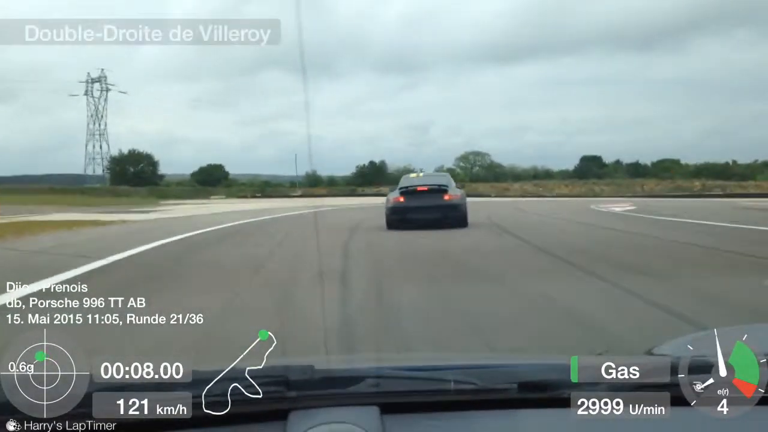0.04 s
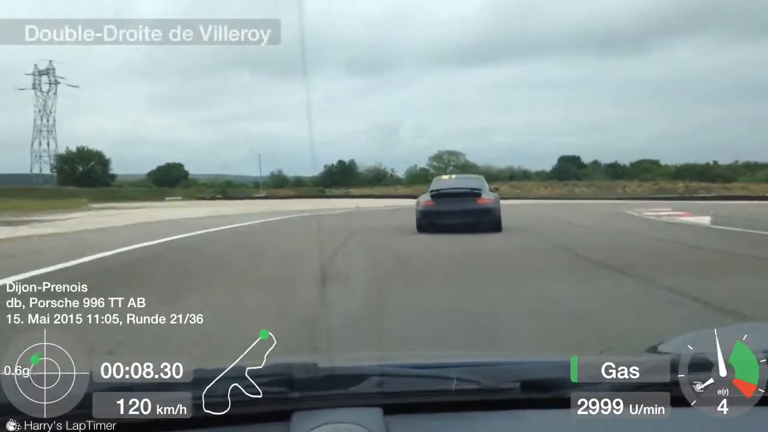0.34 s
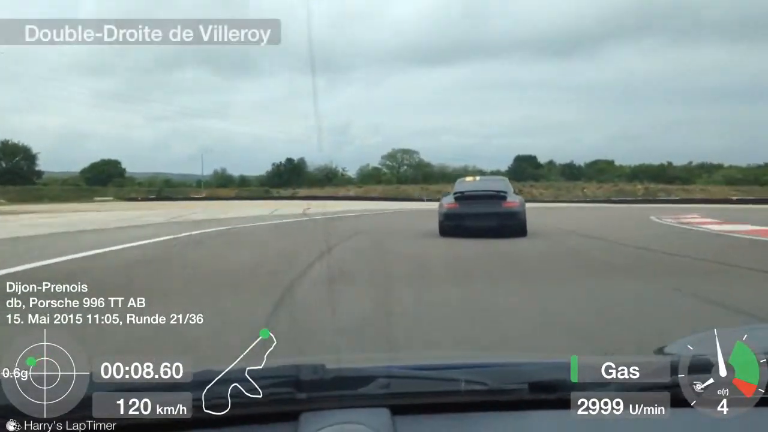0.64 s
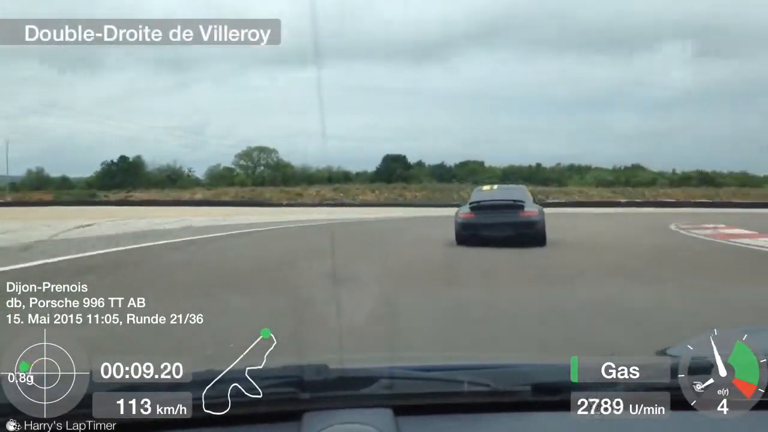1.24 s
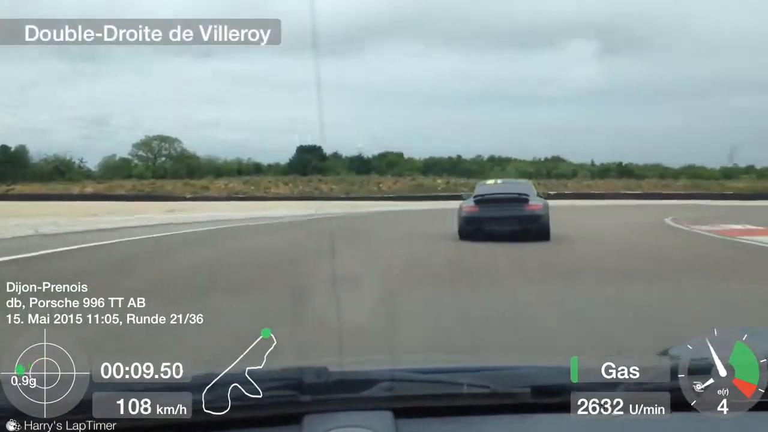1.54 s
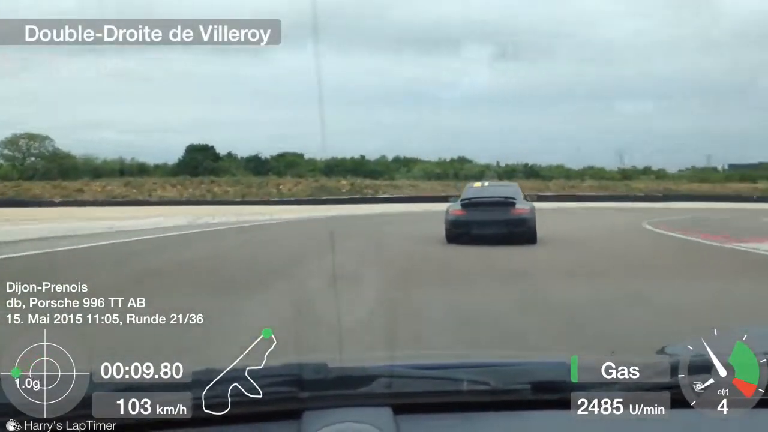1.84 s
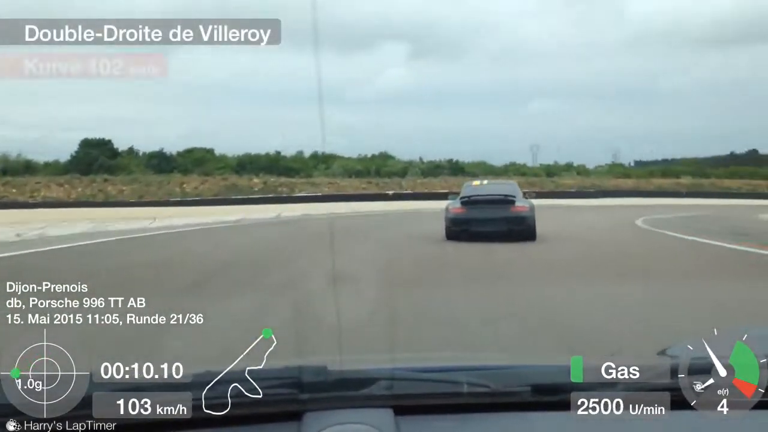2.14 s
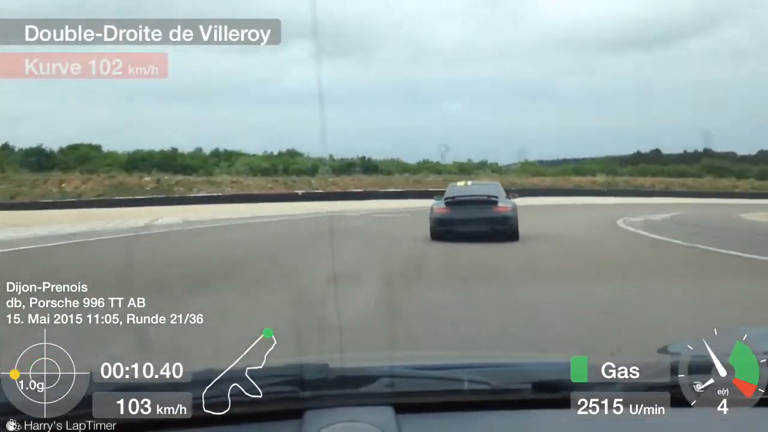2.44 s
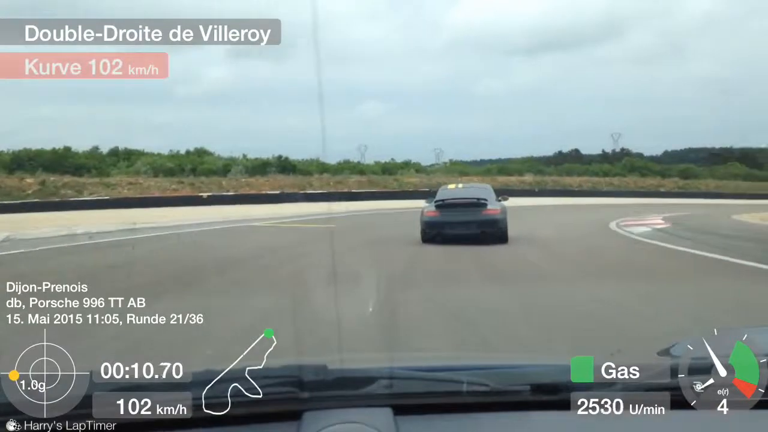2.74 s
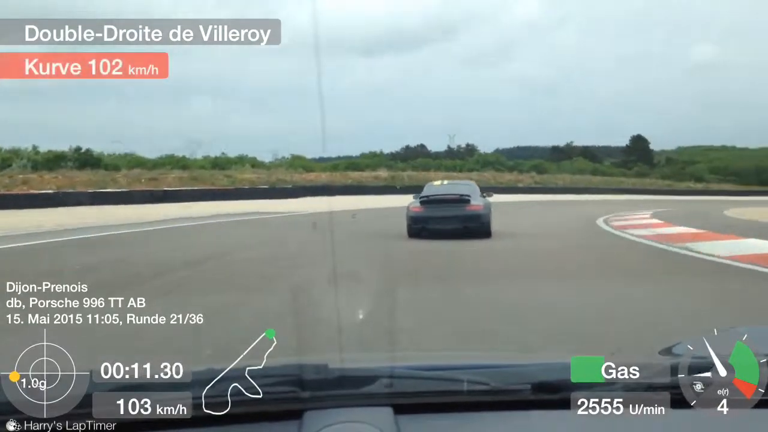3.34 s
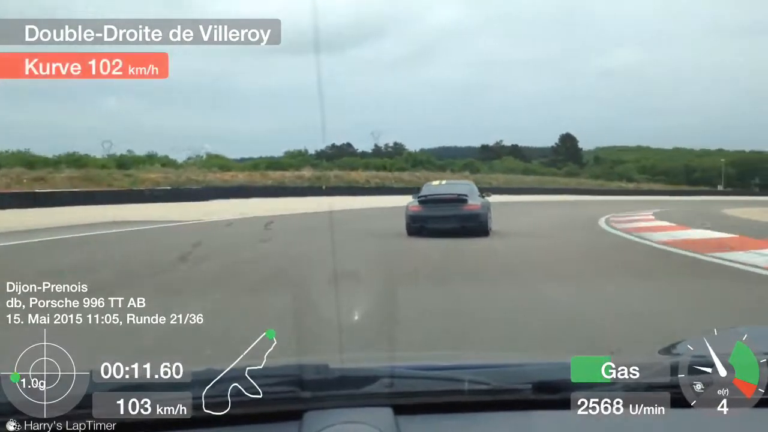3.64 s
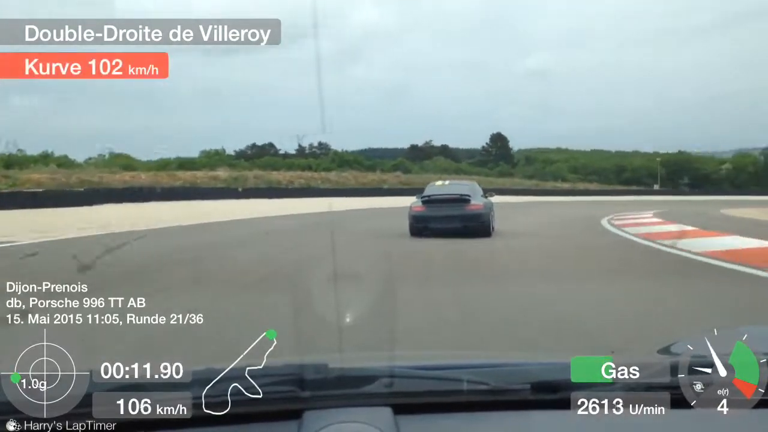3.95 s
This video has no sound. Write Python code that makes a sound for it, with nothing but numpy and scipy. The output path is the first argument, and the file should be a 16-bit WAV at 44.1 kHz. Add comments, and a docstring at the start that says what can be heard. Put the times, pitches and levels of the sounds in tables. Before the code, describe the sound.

A sports car's engine drones over steady road rumble, heard from inside. Its pitch dips in the first second, then holds, growing louder from about 2.5 seconds. A faint gear whine and thin squeals sit above it, while grit sprays lightly against the body around 0.2, 1.5 and 2 seconds. At about 3.6 seconds a stone hits the windscreen with one sharp, loud crack and a brief glassy ring.

```python
"""Inside a sports car rounding a long bend on a race track. The six-cylinder engine drones at multiples
of its crank speed, swelling with the throttle, and a gear whines above it. The road rumbles through
the body under a thin rush of air and faint squeals, while grit thrown up by the car ahead ticks against
it. Near the end a stone hits the windscreen: one sharp crack and a brief ring of glass."""
import sys
import numpy as np
from scipy import signal
from scipy.fft import rfft, irfft
from scipy.io import wavfile

SR = 44100
rng = np.random.default_rng(int(sys.argv[2]) if len(sys.argv) > 2 else 0)


def bounce(signal):
    """Save signal as a 16-bit WAV file at the path given by the first command-line argument."""
    frames = np.transpose(np.atleast_2d(signal))
    limited = np.clip(frames, -1, 1)
    pcm = np.round(limited * 32767).astype(np.int16)
    wavfile.write(sys.argv[1], SR, pcm)


N = 176400
T = np.arange(N) / SR

# The revs. Each row: time in seconds, crank turns per second.
CRANK_SPEED = [(0, 49.2), (.35, 46), (.62, 42.6), (.85, 41.7), (1.2, 42.2), (1.75, 41.55), (2.25, 41.7),
               (2.58, 41.9), (2.75, 41.9), (3.05, 42.05), (3.7, 42.6), (4, 43.6)]
# Engine tones on the throttle and drivetrain tones while slowing.
# Each row: multiple of crank speed, level in dB relative to that layer's fader.
THROTTLE_ORDERS = [(1.5, -17.5), (3, 1), (5, -22.5), (6, -26.5)]
SLOWING_ORDERS = [(1, -20.5), (1.35, 4.5), (2, -6.5), (5, 1.5), (6.5, -16.5), (12, -20)]
# Faders for those two layers, the growl and the gear whine. Each row: time in seconds, level in dB.
THROTTLE_FADER = [(0, -28.5), (.5, -24), (.95, -25), (1.25, -19.5), (1.5, -22), (1.78, -15), (2.0, -23),
                  (2.22, -24.5), (2.42, -19), (2.59, -15.5), (2.69, -17.5), (3.0, -14), (3.3, -15),
                  (3.56, -12.5), (3.7, -17.5), (4, -13)]
SLOWING_FADER = [(0, -23.5), (.25, -22.5), (.5, -28.5), (.9, -37.5), (1.5, -54), (4, -38)]
GROWL_FADER = [(0, -42.5), (1.3, -41), (1.8, -42), (2.2, -51), (2.75, -43), (3.07, -32.5), (3.3, -44),
               (3.6, -38.5), (3.85, -31), (4, -37.5)]
WHINE_FADER = [(0, -63), (.5, -47), (.7, -37), (1.5, -31), (2.05, -40), (2.35, -33.5), (2.65, -36),
               (3.05, -31), (3.5, -36.5), (3.8, -39.5), (4, -49)]

# Colours of the road noise, low to high. Each row: frequency in Hz, density in dB per Hz.
SHAKE_SPECTRUM = [(12, -66), (25, -55), (40, -50.5), (50, -45), (65, -61.5)]
BOOM_SPECTRUM = [(38, -57.5), (48, -46), (60, -43.5), (78, -38), (100, -41), (125, -47.5), (170, -74)]
PANEL_SPECTRUM = [(85, -74.5), (120, -50), (142, -42), (158, -36.5), (176, -44), (215, -47.5), (242, -44.5),
                  (275, -58.5), (380, -86.5)]
TYRE_SPECTRUM = [(200, -70.5), (290, -55), (350, -57), (405, -53.5), (480, -60), (540, -61.5), (620, -66),
                 (720, -66.5), (850, -67), (1050, -69.5), (1200, -71), (1550, -73), (2000, -78),
                 (2450, -80), (3000, -88), (5000, -100)]
AIR_SPECTRUM = [(1500, -100), (3200, -87.5), (4300, -88.5), (4900, -93), (7500, -97), (10000, -104),
                (13000, -106), (15000, -110)]
# Their swells; only the swing about the mean counts, scaled by a depth.
# Each row: time in seconds, contour in dB.
SHAKE_SWELL = [(0, -32), (.4, -23.5), (.7, -35.5), (1.2, -32), (1.55, -26), (1.9, -28.5), (2.2, -32),
               (2.8, -33), (3.3, -33.5), (3.7, -28.5), (4, -18)]
BOOM_SWELL = [(0, -13.5), (.12, -13), (.38, -16.5), (.55, -23), (0.799, -16), (.95, -24.5), (1.15, -17.5),
              (1.42, -32), (1.55, -19.5), (1.92, -19.5), (2.002, -25), (2.25, -23), (2.58, -12.5),
              (2.699, -21), (3.049, -18.5), (3.55, -19), (3.749, -25), (3.92, -18.5), (4, -2.5)]
PANEL_SWELL = [(0.0, -23), (0.03, -25.5), (1.32, -20.5), (1.65, -16.5), (1.78, -18.5), (1.86, -10.5),
               (2.04, -23), (2.12, -15.5), (2.33, -31.5), (2.39, -17), (2.65, -25), (3.47, -18),
               (3.75, -26.5), (3.98, -24.5)]
TYRE_SWELL = [(0.0, -33.5), (0.05, -36), (0.44, -33.5), (0.45, -34.5), (1.18, -35), (1.19, -36.5),
              (1.39, -33.5), (3.01, -38), (3.6, -37.5)]
AIR_SWELL = [(0.0, -51.5), (0.79, -51.5), (1.09, -50.5), (1.21, -52), (1.44, -54), (1.81, -49.5),
             (2.22, -53), (2.74, -52.5), (3.45, -50.5)]

# Stone on glass, contact then splintering. Each row: start in seconds, gain in dB.
STONE_HITS = [(3.6392, -6), (3.6432, -1.5), (3.6482, -1), (3.6522, -4.5), (3.669, -7.5)]
# Dense ring of the pane with its cabin reflections. Each row: frequency in Hz, density in dB per Hz.
PANE_SPECTRUM = [(500, -84), (1000, -65), (1700, -59.5), (2050, -60.5), (2350, -52.5), (3000, -53),
                 (3500, -53), (4100, -52), (4800, -48), (5200, -55), (5900, -51.5), (7100, -61.5),
                 (8600, -61), (11000, -64.5), (15000, -66.5)]
# Strongest windscreen modes. Each row: frequency in Hz, relative level in dB, 60 dB decay in seconds.
GLASS_MODES = [(1040, -14, .15), (1300, -12, .12), (1750, -12, .12), (2245, -4, .14), (2430, -5, .11),
               (2652, -6, .11), (3222, -2, .14), (3332, -4, .12), (3700, 0, .12), (3970, -4, .11),
               (4075, 1, .12), (4155, -3, .11), (4252, -3, .12), (4356, -4, .12), (4765, -2, .12),
               (5140, -5, .11), (5457, -4, .09), (8430, -11, .1)]
# Sprays of grit on the body.
# Each row: start in seconds, level in dB, rise in seconds, 60 dB decay in seconds, band position in Hz.
GRIT_SPRAYS = [(.231, -33.5, .002, .15, 5200), (.51, -50, .02, .2, 7500), (.66, -46.5, .025, .25, 6200),
               (.7605, -40, .001, .035, 7000), (1.474, -36.5, .014, .19, 3900),
               (1.708, -44.5, .02, .35, 5200), (1.952, -40.5, .015, .13, 4200),
               (2.06, -40, .001, .03, 6500), (2.58, -50, .01, .1, 7000), (3.1, -49, .025, .3, 7000),
               (3.53, -43.5, .025, .3, 5200)]
# Squeals of the moving car.
# Each row: start and end in seconds, pitch in Hz, resonance width in Hz, level at the crest in dB.
SQUEALS = [(.02, 0.448, 3250, 70, -58), (0.747, 2.003, 1035, 90, -43.5), (.9, 1.28, 4300, 60, -59),
           (2.3, 3.7, 1040, 90, -48), (2.4, 3.603, 2410, 40, -63), (2.5, 2.62, 8400, 40, -66),
           (2.6, 4.194, 4265, 53.7, -61)]


def engine():
    """Six cylinders fire three times a turn: a throttle drone, a drivetrain hum and a growl on top."""
    pulling = sum(crank_tone(order, curve(THROTTLE_FADER) + db) for order, db in THROTTLE_ORDERS)
    slowing = sum(crank_tone(order, curve(SLOWING_FADER) + db) for order, db in SLOWING_ORDERS)
    growl = crank_tone(9, curve(GROWL_FADER))  # third harmonic of the firing rate
    return pulling + slowing + growl


def gear_whine():
    """Meshing teeth sing at 14 times the crank speed, wavering slightly in pitch."""
    order = 14 * (1 + .004 * drift(8.7))
    return crank_tone(order, curve(WHINE_FADER), rough_db=1.7)


def crank_tone(order, db, rough_db=1.84):
    """One sine riding a multiple of the crank speed, its level a little unsteady."""
    phase = 2 * np.pi * np.cumsum(order * curve(CRANK_SPEED)) / SR + rng.uniform(0, 2 * np.pi)
    return np.sqrt(2) * from_db(db + rough_db * drift(13.7)) * np.sin(phase)


def road():
    """The road comes through the body: shake, boom and drumming panels, then tyre roar and rushing air."""
    shake = road_layer(SHAKE_SPECTRUM, SHAKE_SWELL, depth=.93, flutter_db=4, flutter_hz=6)
    boom = road_layer(BOOM_SPECTRUM, BOOM_SWELL, depth=.62, flutter_db=.3, flutter_hz=3.7)
    panels = road_layer(PANEL_SPECTRUM, PANEL_SWELL, depth=.6, flutter_db=1.06, flutter_hz=14)
    tyres = road_layer(TYRE_SPECTRUM, TYRE_SWELL, depth=.48, flutter_db=1.2, flutter_hz=15)
    air = road_layer(AIR_SPECTRUM, AIR_SWELL, depth=.92, flutter_db=1.2, flutter_hz=13)
    return shake + boom + panels + cabin(tyres + air)


def road_layer(spectrum, swell, depth, flutter_db, flutter_hz):
    """One band of road noise, swelling and fluttering with the surface."""
    swing_db = curve(swell) - curve(swell).mean()
    return coloured(spectrum) * from_db(depth * swing_db + flutter_db * drift(flutter_hz))


def stone():
    """A quick run of fractures sets the laminated pane ringing: a noisy crack with glassy tones in it."""
    rise_s, modes_db = .0013, -29
    split = signal.butter(1, 5500, fs=SR, output="sos")
    out = np.zeros(N)
    for start, db in STONE_HITS:
        dense = coloured(PANE_SPECTRUM)
        body = signal.sosfilt(split, dense)
        treble = dense - body
        crack = body * burst(start, rise_s, t60=.087) + treble * burst(start, rise=.0039, t60=.1)
        out += from_db(db) * crack
    for hz, mode_db, t60 in GLASS_MODES:
        power = sum((from_db(db) * burst(start, rise_s, t60)) ** 2 for start, db in STONE_HITS)
        ring = np.sin(2 * np.pi * hz * T + rng.uniform(0, 2 * np.pi))
        out += from_db(modes_db + mode_db) * np.sqrt(power) * ring
    return out


def grit_ticks():
    """Fine grains tick at random against the body, louder as the air rushes."""
    grains_per_s, spread_db, t60, level_db = 200, 3.1, .005, -61.5
    impacts = rng.random(N) < grains_per_s / SR
    sizes = from_db(spread_db * np.minimum(rng.exponential(1, N), 4))
    decay = np.exp(-2 * np.log(1000) / (t60 * SR))
    power = signal.lfilter([1], [1, -decay], impacts * sizes ** 2 + 1e-18)
    ticks = np.sqrt(power) * bright_noise(6940, edge_ratio=1.35)
    rush = from_db(.97 * curve(AIR_SWELL))
    return from_db(level_db) * rms_one(ticks * rush)


def grit_sprays():
    """Handfuls of grit land together in short, grainy splashes of hiss."""
    sprays = sum(from_db(db) * burst(start, rise, t60) * bright_noise(hz, edge_ratio=1.9)
                 for start, db, rise, t60, hz in GRIT_SPRAYS)
    grain_db = 2.2 * drift(290)
    return sprays * from_db(grain_db)


def squeals():
    """Faint, breathy whistles: noise in narrow resonances, each fading in and out."""
    out = np.zeros(N)
    for start, end, hz, width_hz, db in SQUEALS:
        b, a = signal.iirpeak(hz, hz / width_hz, fs=SR)
        narrow = signal.lfilter(b, a, signal.lfilter(b, a, rng.standard_normal(N)))
        progress = np.clip((T - start) / (end - start), 0, 1)
        arch = np.sqrt(np.abs(np.sin(np.pi * progress)))
        out += from_db(db) * rms_one(narrow) * arch
    return out


def cabin(x, t60=.06, low_cut_hz=850, wet_db=-9):
    """Glass and trim add a short, dense tail of reflections above the bass."""
    t = T[:SR // 5]
    tail = rng.standard_normal(len(t)) * np.exp(-np.log(1000) * t / t60)
    low_cut = signal.butter(2, low_cut_hz, "high", fs=SR, output="sos")
    tail = signal.sosfilt(low_cut, tail / np.linalg.norm(tail))
    return x + from_db(wet_db) * signal.fftconvolve(x, tail)[:N]


def coloured(spectrum):
    """Noise with the given spectrum, rolling off beyond its ends."""
    hz, db = np.transpose(spectrum)
    f = np.arange(N // 2 + 1) * SR / N + 1e-3
    skirts = np.minimum(1, np.minimum(f / hz[0], hz[-1] / f)) ** 2
    density = from_db(np.interp(np.log(f), np.log(hz), db))
    return irfft(rfft(rng.standard_normal(N)) * skirts * density, N) * np.sqrt(SR / 2)


def bright_noise(hz, edge_ratio, ceiling_hz=11600):
    """A broad band of hiss around one frequency, at unit power."""
    top = min(hz * edge_ratio, ceiling_hz)
    band = signal.butter(2, [hz / edge_ratio, top], "band", fs=SR, output="sos")
    return rms_one(signal.sosfilt(band, rng.standard_normal(N)))


def drift(hz):
    """A smooth random wobble at unit power, mostly slower than the given rate."""
    hop, run_in = 40, 2000
    pole = np.exp(-2 * np.pi * hz * hop / SR)
    noise = rng.standard_normal(N // hop + run_in + 2)
    slow = signal.lfilter([1], [1, -2 * pole, pole * pole], noise)[run_in:]
    return np.interp(np.arange(N) / hop, np.arange(len(slow)), rms_one(slow))


def burst(start, rise, t60):
    """A straight attack, then a decay of 60 dB in t60 seconds."""
    attack = np.clip((T - start) / rise, 0, 1)
    return attack * np.exp(-np.log(1000) * np.clip((T - start - rise) / t60, 0, 10))


def curve(rows):
    """Breakpoints joined by straight lines in time."""
    return np.interp(T, *np.transpose(rows))


def from_db(db):
    """Decibels to gain."""
    return 10 ** (np.asarray(db) / 20)


def rms_one(x):
    """Scale to unit power."""
    return x / np.sqrt(np.mean(x ** 2) + 1e-20)


def scene():
    """The mono mix from behind the windscreen."""
    return (engine() + gear_whine() + road() + squeals() + grit_ticks() + grit_sprays() + stone())[None]


def record(dry):
    """A soft clip rounds the highest peaks and a steep low-pass takes off the very top."""
    ceiling, cutoff_hz = .73, 15100
    rounded = dry / (1 + (dry / ceiling) ** 8) ** (1 / 8)
    return signal.sosfilt(signal.ellip(10, .1, 90, cutoff_hz, fs=SR, output="sos"), rounded)


dry = scene()
out = record(dry)
bounce(out)
```